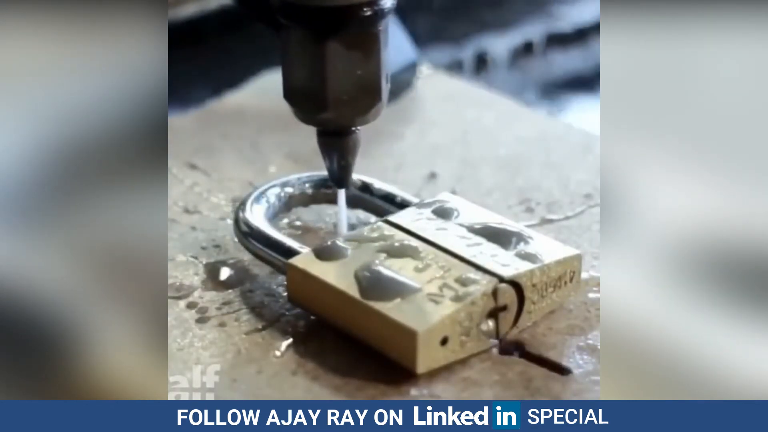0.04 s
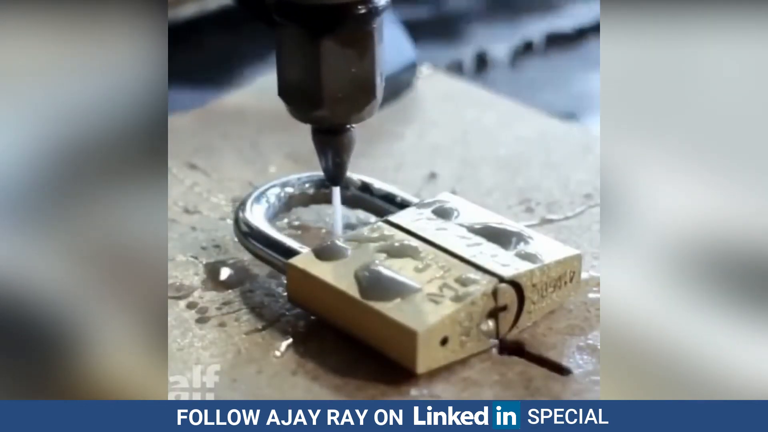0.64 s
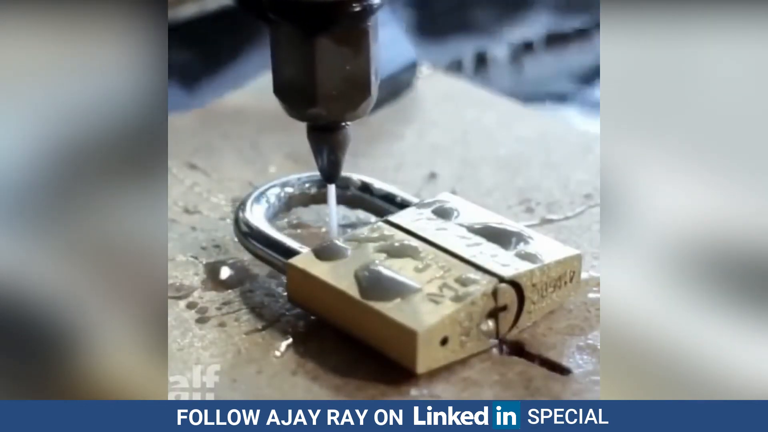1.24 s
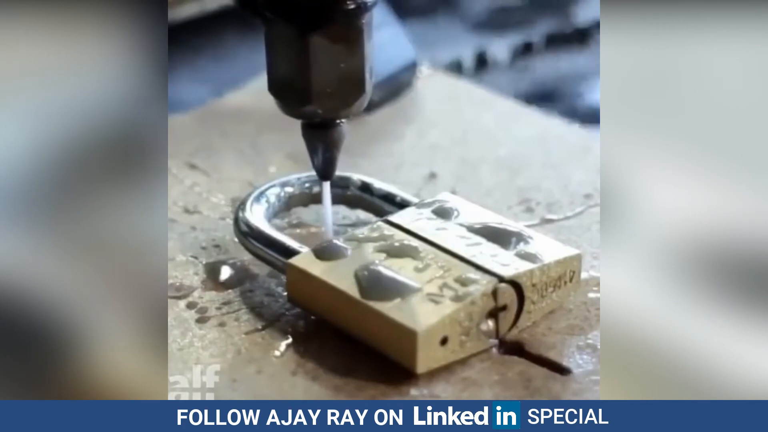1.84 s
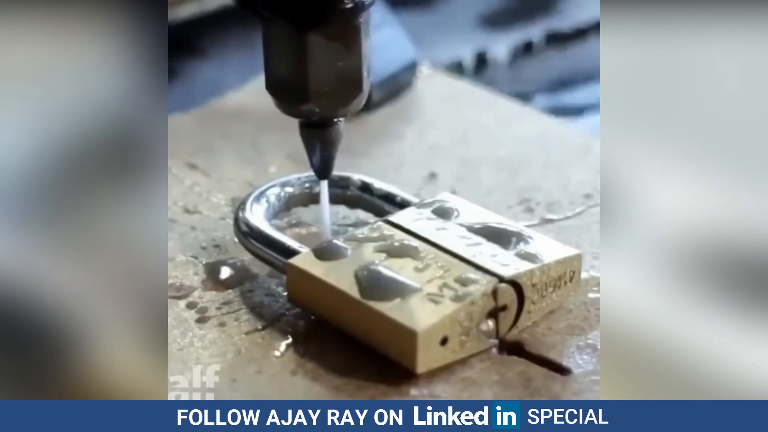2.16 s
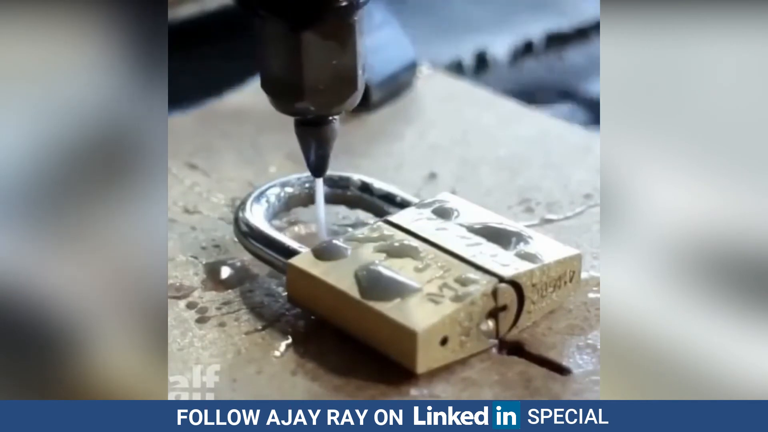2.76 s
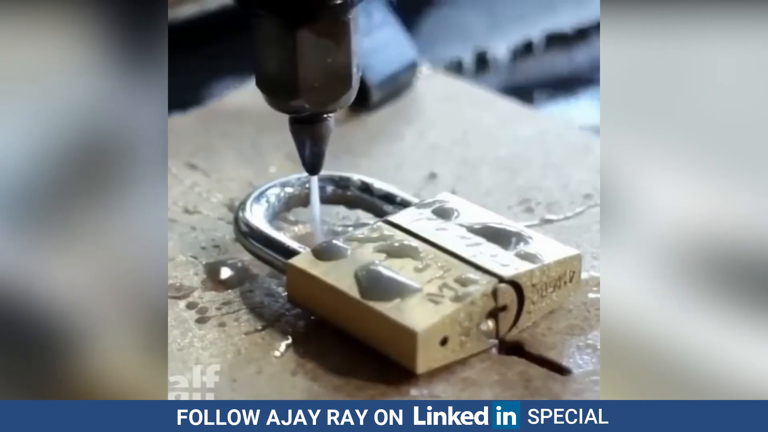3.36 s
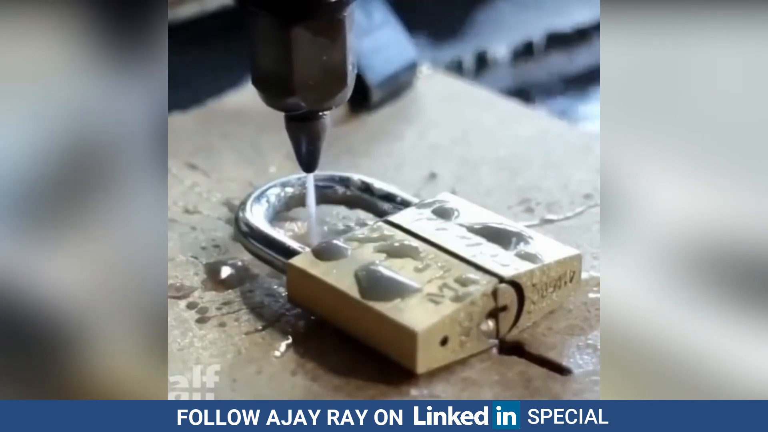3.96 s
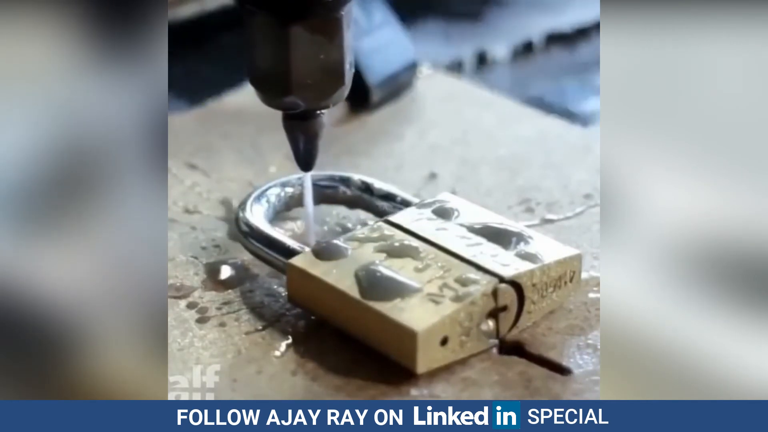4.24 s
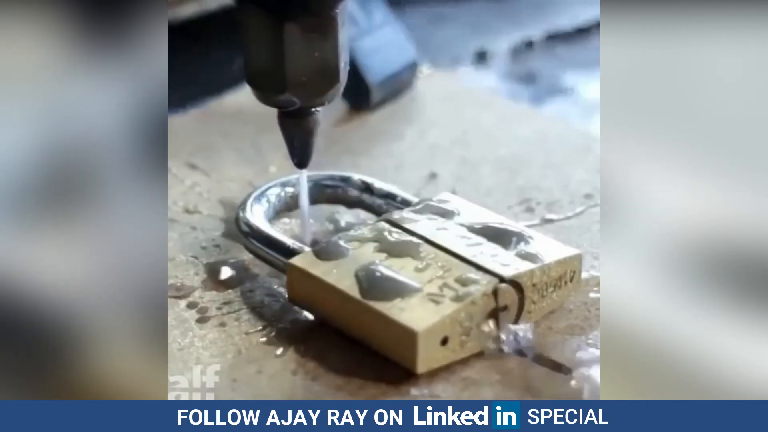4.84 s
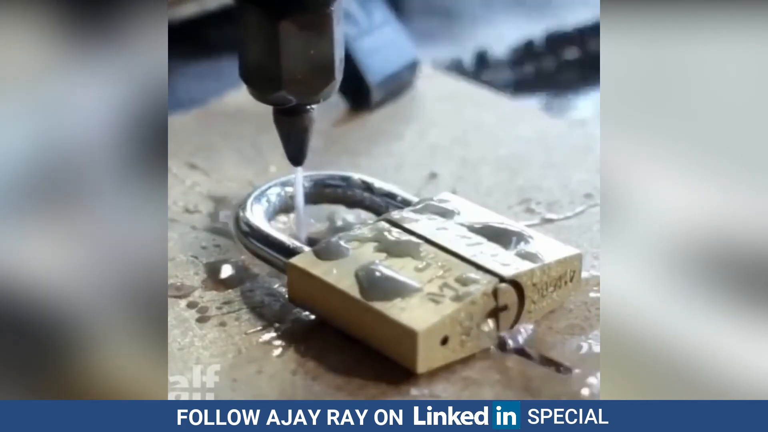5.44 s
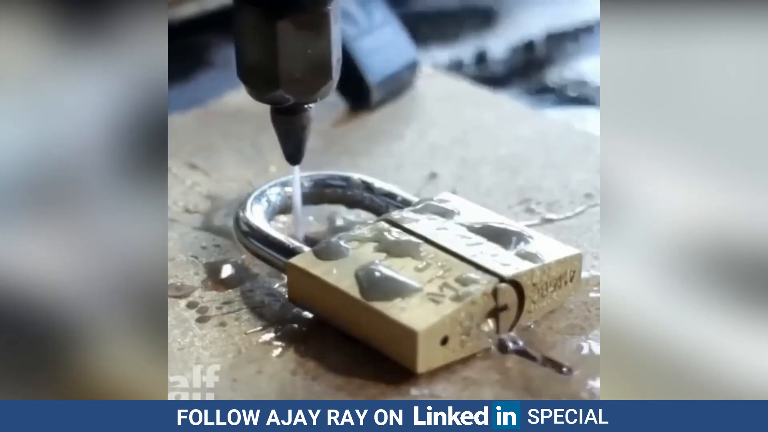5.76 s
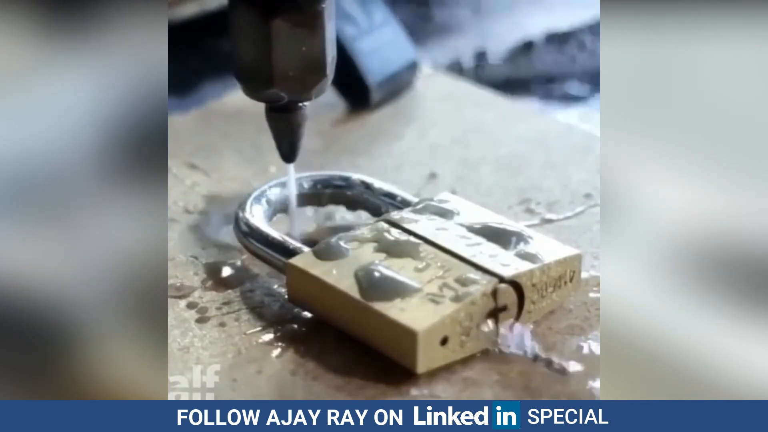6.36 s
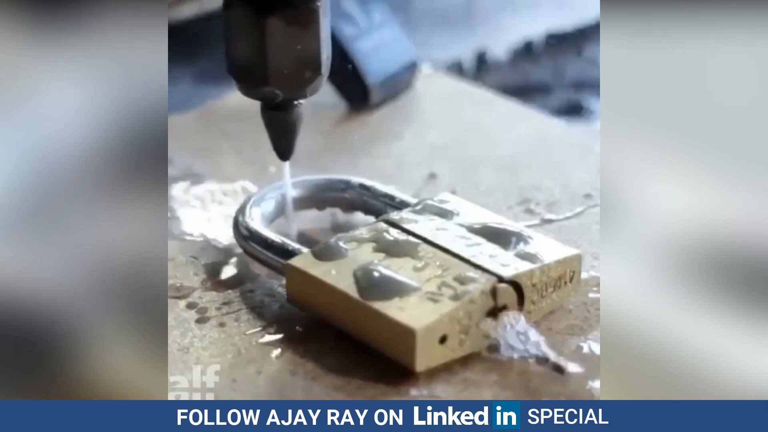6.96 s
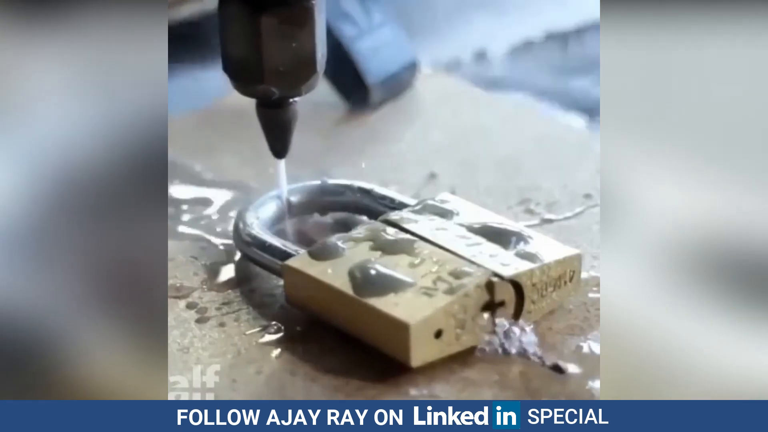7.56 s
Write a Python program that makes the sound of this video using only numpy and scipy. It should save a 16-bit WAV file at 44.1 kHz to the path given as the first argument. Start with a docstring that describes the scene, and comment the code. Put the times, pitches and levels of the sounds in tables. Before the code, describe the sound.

A high-pressure water jet cuts a brass padlock, heard close up for about seven and a half seconds. From the start there is a bright, fluttering hiss with a gritty rasp, surging and dipping slightly, while spray gargles and spatters in the lock's hollows. Lower and quieter, water churns in the tank, with scattered glugs, clearest around 0.1, 1.7 and 6 seconds. Between 3.8 and 4.4 seconds the jet gives several short, wet spits. From 4.5 to 5.1 seconds it breaks through with a gush and a wobbling gurgle that falls in pitch. The hiss then turns thinner and brighter, with a sharp sizzle near 5.5 seconds. At about 6.7 seconds the spray swells again with a low gurgle, and the cutting continues to the end. A faint machine hum, a slight metallic ring and a thin, intermittent whine sit underneath.

```python
"""At a cutting table, close up and in mono, a high-pressure water jet cuts across a brass padlock.
Turbulence makes the jet hiss and flutter in its narrow cut, grit impacts rasp on the metal, and spray
gargles in the resonant hollows of the lock. Midway it breaks through with a falling gurgle.
Below, the spent jet churns the water tank, where large bubbles glug as they oscillate.
Droplets spatter, and the machine hums and whines faintly."""
import sys
import numpy as np
from scipy import signal
from scipy.fft import rfft, irfft
from scipy.io import wavfile

SR = 44100
rng = np.random.default_rng(int(sys.argv[2]) if len(sys.argv) > 2 else 0)


def persist_wave(psi):
    """Save psi, clipped to +-1, as 16-bit WAV."""
    counts = np.round(np.clip(psi, -1, 1) * 32767).astype(np.int16)
    wavfile.write(sys.argv[1], SR, np.atleast_2d(counts).T)


N = 335160
FRAME, HOP = 768, 192  # short-time spectrum [samples]
SECONDS = np.arange(N) / SR
FRAME_TIMES = np.arange(N // HOP + 5) * HOP / SR
FREQS = np.fft.rfftfreq(FRAME, 1 / SR)


# course of the cut: (time [s], base level of hiss [dB], of rasp [dB], relative level of spray [dB])
JET_LEVELS = [(0, -29, -36.5, -38.5), (.9, -28.5, -37, -40.5), (1.5, -30.5, -36.5, -40),
              (2.35, -32.5, -39, -42.5), (2.65, -31, -37.5, -40.5), (3.25, -27, -38.5, -41),
              (3.6, -31.5, -38.5, -40.5), (4.3, -28.5, -36, -39), (4.75, -29, -36.5, -45),
              (5.2, -30.5, -38.5, -45.5), (6.54, -30, -38, -44.5), (6.66, -30, -35.5, -37.5),
              (7.1, -28, -35, -42.5), (7.6, -28, -35, -40)]
# spectral envelopes of hiss and rasp: (frequency [Hz], relative level [dB])
HISS_SPECTRUM = [(1500, -28), (3200, -11.5), (4400, 0), (5500, 5), (6500, 6.5), (8000, 8), (8900, 8.5),
                 (9100, -8), (9250, -42.5), (9450, -71.5)]
RASP_SPECTRUM = [(600, -20), (1300, -4), (2100, 2), (2600, 4.5), (3500, 2.5), (4300, 2), (5500, -17.5),
                 (8000, -59)]

def jet(flutter):
    """Turbulent mixing makes the hiss and grit impacts on brass the rasp; the cut filters both."""
    hiss_db, rasp_db, _ = follow(JET_LEVELS, SECONDS)
    push_db, bite_db = thrust()
    cut_db, tilt_db = cut_response(comb_spacing_hz=1326)
    hiss_colour = envelope(HISS_SPECTRUM, FREQS) + cut_db + tilt_db + 1.57 * eddies(rate_hz=19, bands=36)
    hiss = coloured(hiss_colour, spatter(per_s=3300, spread_db=1.2, strength=0.25))
    rasp_colour = envelope(RASP_SPECTRUM, FREQS) + cut_db + 1.1 * eddies(rate_hz=26, bands=44)
    rasp = coloured(rasp_colour, spatter(per_s=1200, spread_db=2.8, strength=0.43))
    hiss *= from_db(hiss_db + push_db + 0.91 * flutter)
    rasp *= from_db(rasp_db + bite_db + 0.49 * flutter)
    return hiss + rasp


# the stream bites into the brass: (centre time [s], duration [s], hiss gain [dB], rasp gain [dB])
STREAM_SURGES = [(0.051, 0.029, 5, -2), (0.107, 0.032, 4.5, -2), (0.482, 0.13, 1.5, 0),
                 (0.794, 0.026, 1, 1), (1.888, 0.11, 2.5, 1), (2.098, 0.086, 4, 1), (2.181, 0.066, 4, 0.5),
                 (2.59, 0.12, 3, 2.5), (2.86, 0.032, 4, 4.5), (2.949, 0.043, -1, 2.5),
                 (3.096, 0.06, 2, 3.5), (3.135, 0.046, -2, 1.5), (3.315, 0.036, -1, 2.5),
                 (3.562, 0.043, 3.5, 1.5), (3.7, .06, 3, 0), (3.959, 0.044, 2.5, 2), (4.187, 0.077, 0, 3),
                 (4.304, 0.048, -0.5, 3), (4.706, 0.014, 6, 3), (4.785, 0.035, 3.5, 4),
                 (5.154, 0.079, 1.5, -1.5), (5.54, 0.12, 2.5, 1), (5.706, 0.05, 1.5, 1),
                 (6.785, 0.045, 1.5, 1), (6.978, 0.061, 2.5, 0.5), (7.128, 0.053, 2.5, 2.5),
                 (7.37, 0.015, 2.5, 0.5)]
# the stream chokes: (centre time [s], duration [s], hiss gain [dB])
STREAM_CHOKES = [(1.45, .07, -2), (2.02, 0.08, -1.5), (3.011, 0.044, -2.5), (3.27, 0.028, -3.5),
                 (3.481, 0.064, -0.5), (3.83, 0.04, -2), (4.085, 0.056, -2.5), (4.515, 0.12, -1.5),
                 (4.95, .07, -2), (6.22, 0.084, 0), (7.055, 0.019, -2.5)]

def thrust(rasp_share=0.8):
    """Unsteady flow modulates amplitude: the gains in dB of hiss and rasp in surges and chokes."""
    choke_db = bumps(STREAM_CHOKES, SECONDS)
    hiss_db = bumps([(s, length, db) for s, length, db, _ in STREAM_SURGES], SECONDS)
    rasp_db = bumps([(s, length, db) for s, length, _, db in STREAM_SURGES], SECONDS)
    return hiss_db + choke_db, rasp_db + rasp_share * choke_db


# shape of the cut: (time [s], tilt of the hiss [dB/octave], reflection coefficient [0-1])
CUT_SHAPE = [(0, -1.5, 0.08), (1.1, -1.3, 0.08), (2.0, -0.5, 0.08), (2.4, -1.5, 0.1), (2.6, -0.5, 0.15),
             (3.8, -3, 0.11), (4.0, 2, 0.1), (4.45, 3, .15), (4.75, -3, 0.04), (5.35, 6, 0.08),
             (5.7, 3.5, 0.1), (6.5, 1.5, 0.06), (6.8, -3.5, 0.1), (7.6, 0, 0.13)]
# resonances of the cut: (frequency [Hz], bandwidth [Hz], gain [dB])
CUT_RESONANCES = [(2900, 120, 3), (3520, 680, 0.5), (3880, 140, 5), (4180, 130, 3.1), (5350, 310, 3),
                  (6030, 260, 1.5), (6640, 300, 2), (7200, 250, 2), (8150, 300, 1), (8700, 730, -1.4)]
# the slot in the brass sizzles at one resonance: (time [s], gain [dB])
SLOT_SIZZLE = [(0, 6), (.2, 6), (.35, -2), (.46, 6), (.62, 5), (.85, 3.5), (1.3, 6), (1.6, 3), (2.1, 4),
               (2.85, 2.5), (3.15, 4.5), (3.6, 1.5), (4.3, 6.5), (4.8, -0.5), (5.0, 7.5), (5.12, 3.5),
               (5.36, -1), (5.46, 12), (5.58, 5), (5.72, 6.5), (6.0, 3.5), (6.45, 6.5), (6.65, 2),
               (6.8, 8.5), (6.93, 3), (7.12, 6.5), (7.35, 2.5), (7.6, 7)]

def cut_response(comb_spacing_hz, sizzle_hz=4840, sizzle_width_hz=400):
    """An inverted echo comb-filters the resonant cut; returns its response and the hiss tilt in dB."""
    slope, echo = follow(CUT_SHAPE, FRAME_TIMES[:, None])
    cut_db = 20 * np.log10(abs(1 - echo * np.exp(-2j * np.pi * FREQS / comb_spacing_hz)))
    cut_db += drifting(CUT_RESONANCES, rate_hz=12, swing=0.22, slide=0.24)
    sizzle_db = follow(SLOT_SIZZLE, FRAME_TIMES[:, None])[0]
    cut_db += drifting([(sizzle_hz, sizzle_width_hz, sizzle_db)], rate_hz=16, swing=0.36, slide=0.15)
    cut_db += 1.54 * eddies(rate_hz=12, bands=110) + flares()
    return cut_db, slope * np.log2((FREQS + 100) / 7000)


# whistling flares: (centre time [s], duration [s], frequency [Hz], bandwidth [Hz], gain [dB])
EDGE_FLARES = [(3.94, 0.039, 915, 500, 12), (3.978, 0.068, 8500, 514, 8.5), (4.138, 0.07, 825, 225, 19),
               (4.718, 0.26, 1510, 797, 3), (4.79, 0.069, 5770, 607, 3), (6.758, 0.046, 7400, 400, 4.5),
               (7.387, 0.098, 5780, 402, 8.5)]

def flares():
    """Brief excitation of an edge or a hollow by the jet lifts one band, in dB over time and frequency."""
    return sum(np.outer(bumps([(s, length, 1)], FRAME_TIMES), bumps([(hz, width, db)], FREQS))
               for s, length, hz, width, db in EDGE_FLARES)


# spectral envelope of the lock's hollows: (frequency [Hz], relative level [dB])
CAVITY_SPECTRUM = [(300, -25.5), (600, 6), (850, 7), (1020, 6.5), (1300, 7), (1750, 7.5), (2300, 1.5),
                   (3500, -46.5)]
# their resonances: (frequency [Hz], bandwidth [Hz], gain [dB])
CAVITY_MODES = [(840, 54, 1.5), (1310, 540, 1.7), (1460, 160, 4.5), (1920, 190, 2.8)]

def gargle(flutter, trim_db=-1.04):
    """Cavity resonance colours the spray that bursts through the hollows of the lock."""
    colour = envelope(CAVITY_SPECTRUM, FREQS) + bumps(CAVITY_MODES, FREQS)
    colour = colour + flares() + 2.7 * eddies(rate_hz=11.2, bands=90)
    droplets = spatter(per_s=700, spread_db=4.6, strength=0.51)
    level_db = spray_level() + trim_db + 0.31 * flutter + 0.62 * throb(rate_hz=14)
    return coloured(colour, droplets) * from_db(level_db)


# spray gushes through an opened hollow: (onset [s], duration [s], gain [dB])
SPRAY_GUSHES = [(3.762, 0.33, 2), (3.922, 0.016, 6.5), (4.103, 0.093, 1), (4.538, 0.62, 4),
                (4.614, 0.31, 3), (4.643, 0.024, 8)]

def spray_level(attack_s=0.024, release_s=0.03):
    """Relative level in dB of flow through the lock: each gush opens, holds and relaxes exponentially."""
    level_db = follow(JET_LEVELS, SECONDS)[2] + 0.97 * thrust()[1]
    for onset, length, db in SPRAY_GUSHES:
        opening = np.clip((SECONDS - onset) / attack_s, 0, 1)
        draining = np.exp(-np.maximum(SECONDS - onset - length, 0) / release_s)
        level_db += db * opening * draining
    return level_db


# cancellations between lock and table: (frequency [Hz], bandwidth [Hz], gain at depth 1 [dB])
LOW_NOTCHES = [(2700, 200, -8.5), (3830, 190, -12), (4100, 140, -9)]
HIGH_NOTCHES = [(5260, 150, -6), (5520, 150, -5.5), (6660, 240, -6.5), (7880, 220, -5.5)]
# how hollow the jet sounds: (time [s], depth of low notches [ratio], depth of high notches [ratio])
NOTCH_DEPTHS = [(0, .5, 1.1), (.4, .7, 1.4), (.8, 1.2, .9), (1.15, 1, 0.94), (1.5, 1, .5), (2.1, 0.84, .7),
                (2.45, .8, .6), (2.6, .1, .2), (3.3, .25, .3), (3.75, 0.56, .7), (4.0, .1, .4),
                (4.7, 0.34, 0.33), (5.0, .7, .4), (5.25, 0.76, .8), (5.8, 0.73, 0.4), (6.35, 1.6, .25),
                (6.65, .25, .15), (7.35, 0.77, .35), (7.6, 0.44, 0.28)]

def interference(sound, swing=0.8, rate_hz=8):
    """Destructive interference with the table's reflection cuts notches that vary as the spray shifts."""
    spectrum, freqs, out = rfft(sound), np.fft.rfftfreq(N, 1 / SR), sound
    for notches, mean_depth in zip((LOW_NOTCHES, HIGH_NOTCHES), follow(NOTCH_DEPTHS, SECONDS)):
        for hz, width_hz, db in notches:
            band = irfft(spectrum * bumps([(hz, width_hz, 1)], freqs), N)
            depth = mean_depth * np.maximum(1 + swing * throb(rate_hz), 0)
            out = out - band * (1 - from_db(db * depth))
    return out


def reflections(sound, wet_db, t60_s, positions):
    """Early reflections off table and cutting head change their pattern as the head travels."""
    t, wet = np.arange(SR // 10) / SR, np.zeros(N)
    place = np.linspace(0, positions - 1, N)
    for k in range(positions):
        echoes = rng.standard_normal(len(t)) * (t > 0.002) * from_db(-60 * t / t60_s)
        nearness = np.sqrt(np.maximum(1 - abs(place - k), 0))
        wet += signal.oaconvolve(sound * nearness, echoes / np.linalg.norm(echoes))[:N]
    return (sound + from_db(wet_db) * wet) / np.hypot(1, from_db(wet_db))


# water breaks through the lock: (time [s], cavity frequency [Hz], level [dB])
BREAKTHROUGH_GLIDE = [(4.52, 1600, -65), (4.555, 1580, -38), (4.61, 1470, -44), (4.67, 1450, -33),
                      (4.74, 1380, -38), (4.8, 1270, -32), (4.86, 1180, -44), (4.92, 1130, -38),
                      (4.97, 1190, -43), (5.03, 1200, -38.5), (5.08, 1200, -52), (5.13, 1200, -92)]

def breakthrough(stage_width_hz, rough_db, wobble_hz):
    """Sputtering spray excites a cavity resonance that wobbles and sinks as the passage opens."""
    hz, level_db = follow(BREAKTHROUGH_GLIDE, SECONDS)
    ring = gliding_resonance(hz + wobble_hz * throb(rate_hz=30.4), stage_width_hz, stages=2)
    opened = SECONDS > BREAKTHROUGH_GLIDE[0][0]
    return ring * from_db(level_db + rough_db * throb(rate_hz=35)) * opened


# high spits and low gurgles: (onset [s], duration [s], frequency [Hz], bandwidth [Hz], level [dB])
WATER_POCKETS = [(2.852, 0.063, 141, 40, -47), (3.848, 0.14, 460, 220, -36),
                 (3.959, 0.062, 4070, 1000, -30.5), (4.123, 0.036, 3650, 1100, -32.5),
                 (4.124, 0.028, 1110, 800, -33), (4.127, 0.072, 2210, 1300, -37.5),
                 (4.379, 0.12, 3980, 1190, -37), (6.702, 0.24, 513, 138, -43), (6.73, 0.12, 160, 50, -49)]

def spits(attack_s=0.0056, release_s=0.012):
    """Pockets of water, blown out, radiate abrupt transients of band-limited noise."""
    out = np.zeros(N)
    for onset, length, hz, width_hz, db in WATER_POCKETS:
        band = signal.butter(2, [hz - width_hz / 2, hz + width_hz / 2], "band", fs=SR, output="sos")
        size = int(length * SR)
        puff = unit(signal.sosfilt(band, rng.standard_normal(SR // 2))[-size:])
        t = SECONDS[:size]
        gate = np.clip(np.minimum(t / attack_s, (length - t) / release_s), 0, 1)
        out[int(onset * SR):][:size] += from_db(db) * puff * gate
    return out


# the churning tank: (time [s], level [dB], boil frequency [Hz], boil relative to churn [dB])
TANK_COURSE = [(0, -40, 284.9, 1.5), (1.0, -40, 279.8, -2), (1.88, -38.5, 278.2, -0.5),
               (2.18, -40.5, 311.7, -3), (2.55, -38, 360.5, -3), (2.93, -41, 314.5, -6.5),
               (3.1, -39, 308.6, -0.5), (3.43, -40.5, 303.3, -2.5), (3.7, -38, 316.5, 1),
               (4.0, -37, 394, -6), (4.45, -42, 336.2, 0.5), (4.9, -41, 398.8, -4),
               (5.25, -42, 355.9, -0.5), (6.1, -39.5, 333.9, 0), (6.55, -37.5, 324.5, -4.5),
               (6.85, -36.5, 399.1, -10), (7.05, -40, 387.5, -12), (7.6, -42.5, 353.8, -1.5)]
# spectral envelope of the broad churn: (frequency at mean pitch [Hz], relative level [dB])
CHURN_SPECTRUM = [(60, -13), (110, -8), (170, -3.5), (205, 0.5), (250, 3), (330, 0), (440, 0.5), (520, 3),
                  (640, -5), (1100, -8.5), (2500, -58)]

def tank(stage_width_hz):
    """A resonating bubble cloud boils at a drifting pitch over the broadband churn of the water."""
    level_db, centre_hz, boil_db = follow(TANK_COURSE, SECONDS)
    colour = from_db(envelope(CHURN_SPECTRUM, np.fft.rfftfreq(N, 1 / SR)))
    churn = unit(irfft(rfft(rng.standard_normal(N)) * colour, N))
    pitch_ratio = np.sqrt(centre_hz / np.mean(centre_hz))  # smaller bubbles raise the whole churn
    churn = np.interp(np.cumsum(pitch_ratio) % N, np.arange(N), churn)
    boil = from_db(boil_db) * gliding_resonance(centre_hz, stage_width_hz, stages=3)
    bass_cut = signal.butter(3, 70, "high", fs=SR, output="sos")  # bubbles radiate little deep bass
    water = unit(signal.sosfilt(bass_cut, churn + boil))
    return water * from_db(level_db + 0.99 * throb(rate_hz=16))


# large bubbles in the tank: (onset [s], frequency [Hz], peak level [dB])
LARGE_BUBBLES = [(0.117, 267, -31), (.479, 310, -35), (1.546, 293, -32.5), (1.741, 312, -28.5),
                 (1.859, 276, -33), (2.49, 306, -34), (3.69, 327, -37), (3.852, 352, -36),
                 (3.904, 423, -35), (3.976, 382, -33), (5.786, 379, -32), (6.007, 358, -26.5),
                 (6.556, 338, -32)]

def glugs(rise_s=0.0061, glide_per_s=1.7):
    """Each large bubble is a damped oscillator that swells, rings a few cycles and rises in pitch."""
    out, t = np.zeros(N), np.arange(SR // 10) / SR
    swell = t / rise_s * np.exp(1 - t / rise_s)
    for onset, hz, db in LARGE_BUBBLES:
        cycles = np.cumsum(hz * (1 + glide_per_s * (t - rise_s))) / SR + rng.random()
        out[int(onset * SR):][:len(t)] += from_db(db) * swell * np.sin(2 * np.pi * cycles)
    return out


# natural modes of the metal: (frequency [Hz], bandwidth [Hz], relative level [dB])
METAL_MODES = [(855, 30, -7), (1345, 16, -8), (1405, 14, -6), (1485, 30, -3), (3670, 45, 2)]

def metal_ring(level_db, drive_exponent):
    """Forced vibration: narrow metal modes ring harder the more spray breaks through."""
    drive = rng.standard_normal(N) * from_db(drive_exponent * spray_level())
    out = np.zeros(N)
    for hz, width_hz, db in METAL_MODES:
        pole = np.exp(np.pi * (2j * hz - width_hz) / SR)
        out += from_db(db) * unit(signal.lfilter([1], [1, -pole], drive).real)
    return from_db(level_db) * unit(out)


# partials of the machine's hum: (frequency [Hz], initial rms level [dB])
HUM_PARTIALS = [(81, -64.5), (200, -59), (231, -49.5), (306, -54.5)]
# a thin whine comes and goes: (time [s], rms level [dB])
WHINE_LEVELS = [(2.0, -68), (2.27, -51.5), (3.2, -52.5), (3.5, -59), (4.9, -53.5), (5.3, -68), (6.55, -69),
                (6.8, -51), (7.2, -53), (7.6, -57)]

def machine(waver_hz, waver_db, whine_hz=1201, hum_fade_db_per_s=1.2):
    """Periodic vibration radiates tones: a fading hum and a motor's whine waver in pitch and level."""
    whine_db = follow(WHINE_LEVELS, SECONDS)[0]
    tones = [(hz, db - hum_fade_db_per_s * SECONDS) for hz, db in HUM_PARTIALS]
    tones += [(whine_hz, whine_db), (whine_hz / 2, whine_db - 6)]
    out = np.zeros(N)
    for hz, db in tones:
        cycles = np.cumsum(hz + waver_hz * throb(rate_hz=9.5)) / SR
        amplitude = np.sqrt(2) * from_db(db + waver_db * throb(rate_hz=5.3))
        out += amplitude * np.sin(2 * np.pi * cycles)
    return out


def rumble(level_db, band_hz, surge_db):
    """Random amplitude modulation makes a faint band of deep noise surge unevenly."""
    band = signal.butter(3, band_hz, "band", fs=SR, output="sos")
    noise = unit(signal.sosfilt(band, rng.standard_normal(N)))
    return noise * from_db(level_db + surge_db * throb(rate_hz=6))


def spatter(per_s, spread_db, strength):
    """Shot noise: separate impacts of uneven size within the Gaussian noise of a fine mist."""
    sizes = from_db(spread_db * np.minimum(rng.exponential(1, N), 4)) * rng.choice([-1, 1], N)
    mist = rng.standard_normal(N)
    impacts = unit(sizes * (rng.random(N) < per_s / SR))
    return mist + strength * impacts


def coloured(colour_db, source):
    """Source-filter principle: a time-varying filter, of equal power in each frame, shapes a noise."""
    gain = from_db(colour_db)
    gain /= np.sqrt(np.mean(gain ** 2, axis=1, keepdims=True))
    _, _, spectra = signal.stft(np.pad(source, (0, 2 * FRAME)), nperseg=FRAME, noverlap=FRAME - HOP)
    filtered = spectra[:, :len(FRAME_TIMES)] * gain.T
    return unit(signal.istft(filtered, nperseg=FRAME, noverlap=FRAME - HOP)[1][:N])


def gliding_resonance(hz, stage_width_hz, stages):
    """Heterodyning: noise narrowed by cascaded one-pole filters is shifted to a moving frequency."""
    pole = np.exp(-np.pi * stage_width_hz / SR)
    noise = rng.standard_normal(N) + 1j * rng.standard_normal(N)
    baseband = signal.lfilter([1], np.poly([pole] * stages), noise)
    return unit((baseband * np.exp(2j * np.pi * np.cumsum(hz) / SR)).real)


def drifting(modes, rate_hz, swing, slide):
    """Resonances follow geometry: as the cut changes shape, their gains in dB and pitches wander."""
    out = 0
    for hz, width_hz, db in modes:
        shift, swell = wander(rate_hz, columns=2).T[:, :, None]
        out = out + bumps([(hz + slide * width_hz * shift, width_hz, db * (1 + swing * swell))], FREQS)
    return out


def eddies(rate_hz, bands):
    """Turbulent fluctuation: overlapping bands swell independently, in patches of time and frequency."""
    place = np.linspace(0, bands - 1, len(FREQS))
    blend = np.sqrt(np.maximum(1 - abs(place - np.arange(bands)[:, None]), 0))
    return wander(rate_hz, bands) @ blend


def wander(rate_hz, columns):
    """Independent band-limited random processes of overall rms 1, one value a frame."""
    hz = np.fft.rfftfreq(len(FRAME_TIMES), HOP / SR)[:, None]
    white = rfft(rng.standard_normal((len(FRAME_TIMES), columns)), axis=0)
    smooth = white / np.sqrt(1 + (hz / rate_hz) ** 4) * hz / (hz + 2)
    return unit(irfft(smooth, len(FRAME_TIMES), axis=0))


def throb(rate_hz):
    """One smooth random modulator, interpolated to every sample."""
    return np.interp(SECONDS, FRAME_TIMES, wander(rate_hz, columns=1)[:, 0])


def bumps(rows, axis):
    return sum(height * np.exp2(-np.minimum((2 * (axis - centre) / width) ** 2, 20))
               for centre, width, height in rows)


def envelope(points, hz):
    """Spectral envelope in dB, interpolated on a logarithmic frequency axis."""
    point_hz, db = np.transpose(points)
    return np.interp(np.log(hz + 1), np.log(point_hz + 1), db)


def follow(table, t):
    """Linear interpolation of a table's columns at the times t."""
    times, *columns = np.transpose(table)
    return [np.interp(t, times, column) for column in columns]


def from_db(db):
    """Amplitude ratio of a level in decibels."""
    return 10 ** (np.asarray(db) / 20)


def unit(x):
    """Normalisation to rms 1."""
    return x / np.sqrt(np.mean(x ** 2) + 1e-20)


def scene():
    """Superposition of all sources at one point; one flutter modulates hiss, rasp and gargle together."""
    flutter = throb(rate_hz=20.6)
    cutting = reflections(jet(flutter) + gargle(flutter), wet_db=-11, t60_s=0.059, positions=10)
    metal = metal_ring(level_db=-53.5, drive_exponent=1.3)
    below = tank(stage_width_hz=170) + glugs() + rumble(level_db=-77.5, band_hz=(40, 72), surge_db=4)
    mono = interference(cutting) + breakthrough(stage_width_hz=400, rough_db=2, wobble_hz=80)
    mono += spits() + below + metal + machine(waver_hz=3.63, waver_db=3.5)
    return np.array([mono, mono])


def record(dry):
    """Band limiting: a steep low-pass filter removes the treble above 9600 Hz."""
    low_pass = signal.firwin(511, 9600, window=("kaiser", 9), fs=SR)
    return signal.oaconvolve(dry, low_pass[None], "same")


dry = scene()
out = record(dry)
persist_wave(out)
```